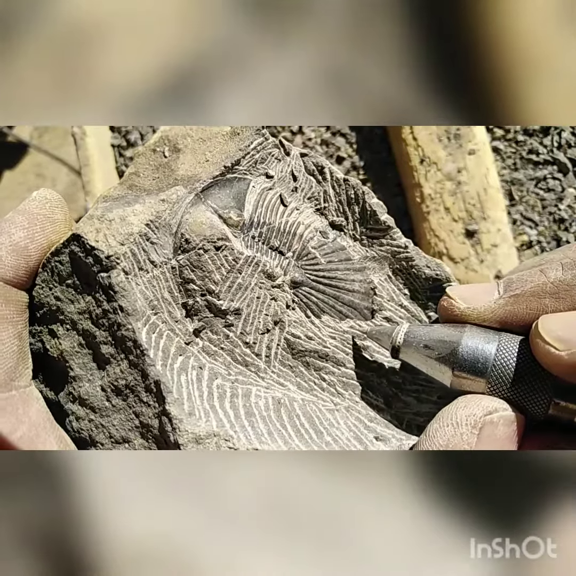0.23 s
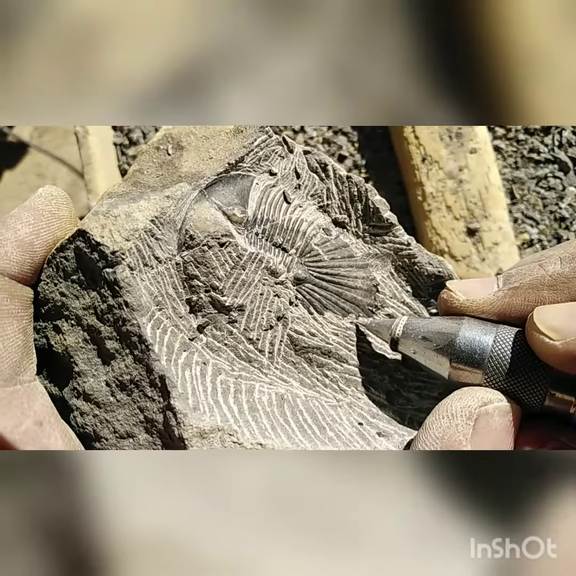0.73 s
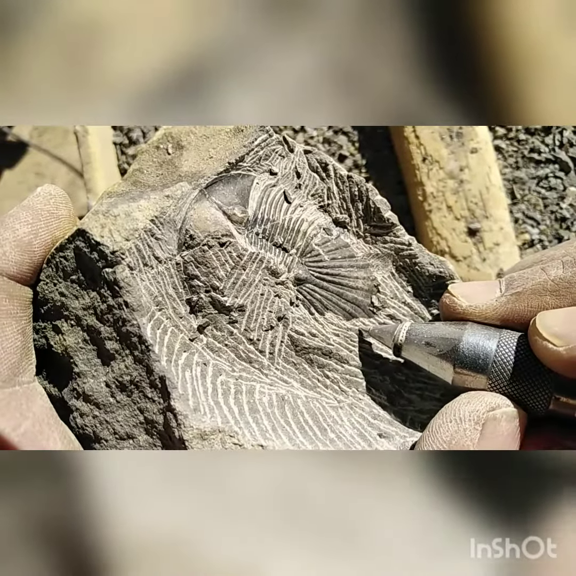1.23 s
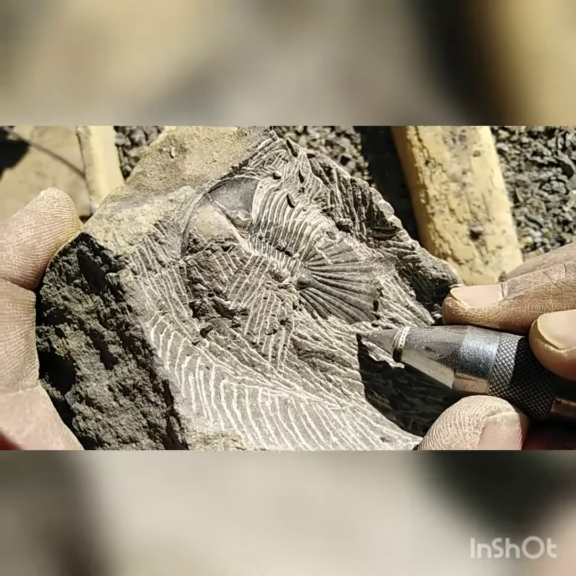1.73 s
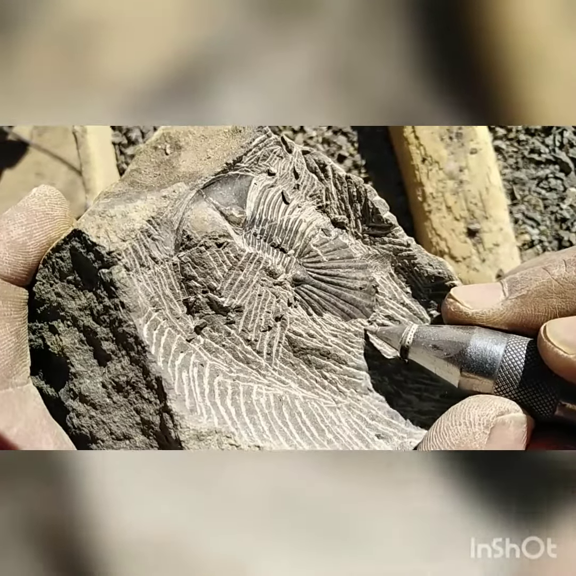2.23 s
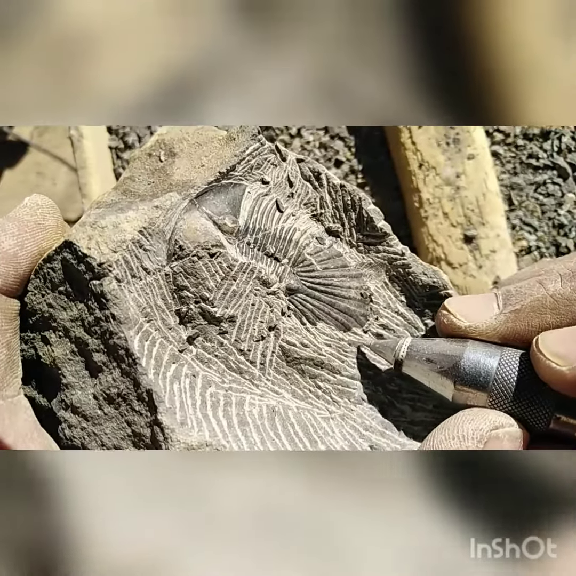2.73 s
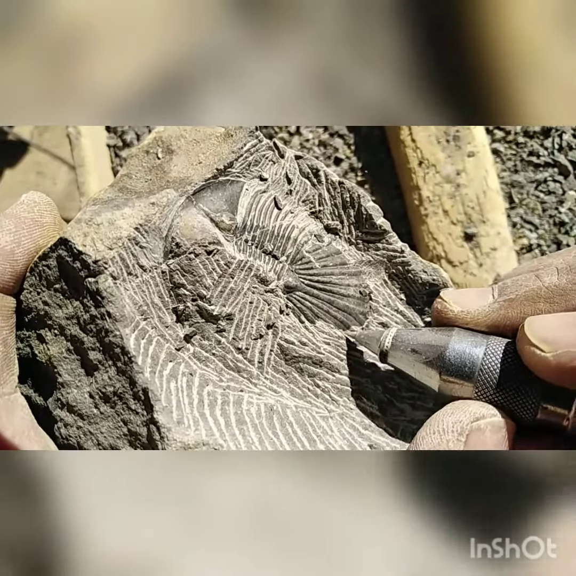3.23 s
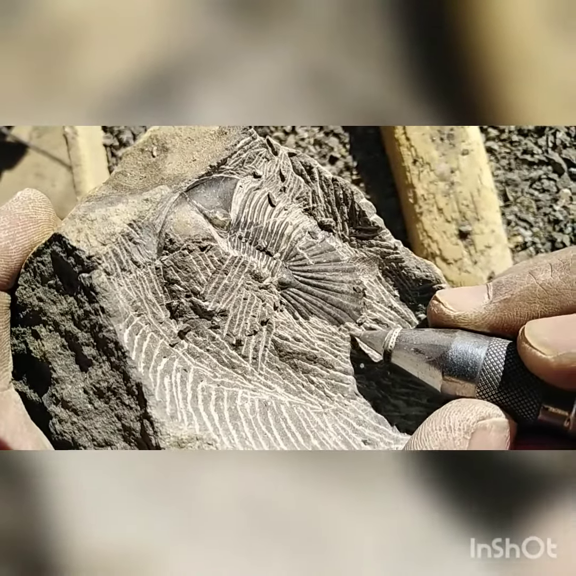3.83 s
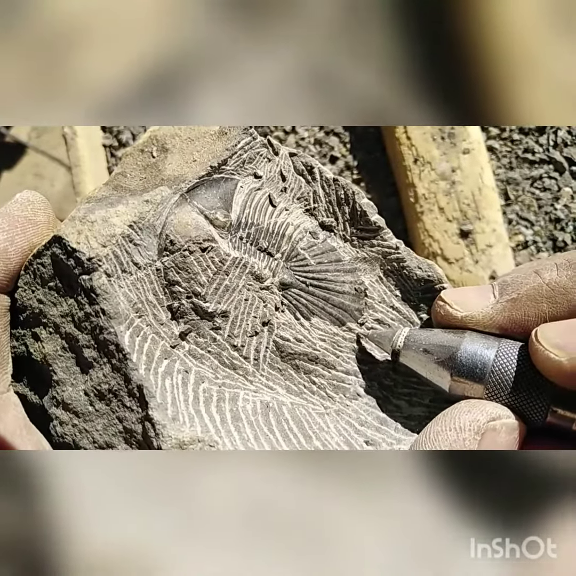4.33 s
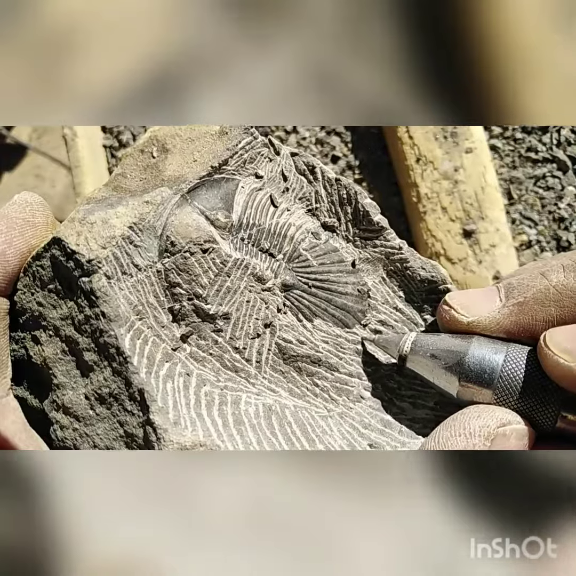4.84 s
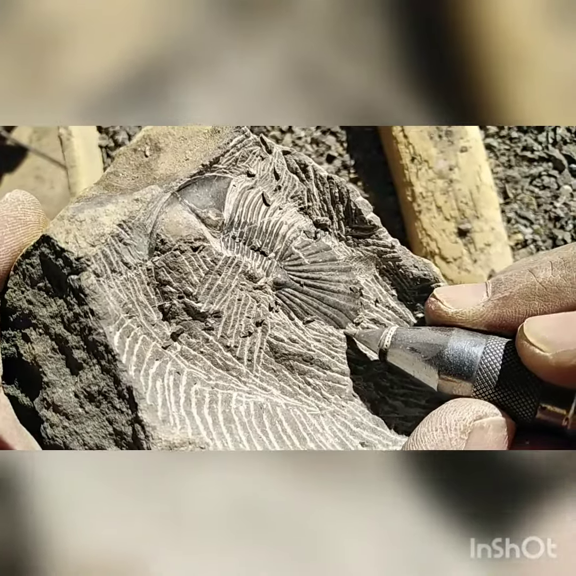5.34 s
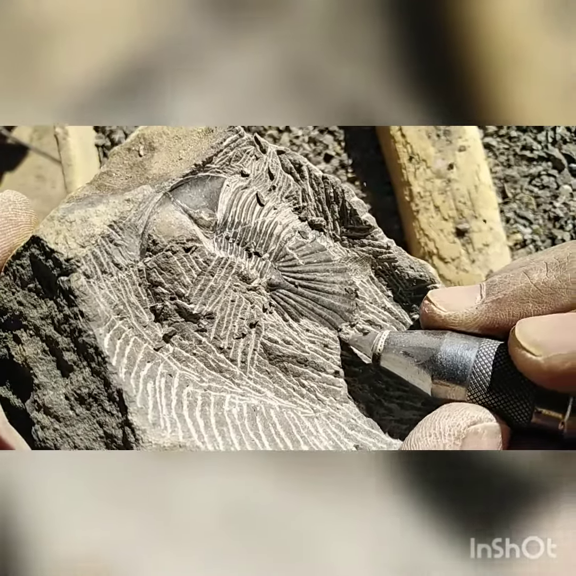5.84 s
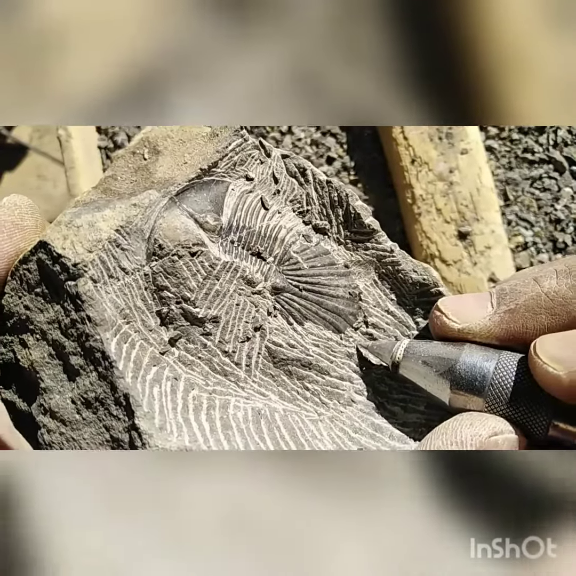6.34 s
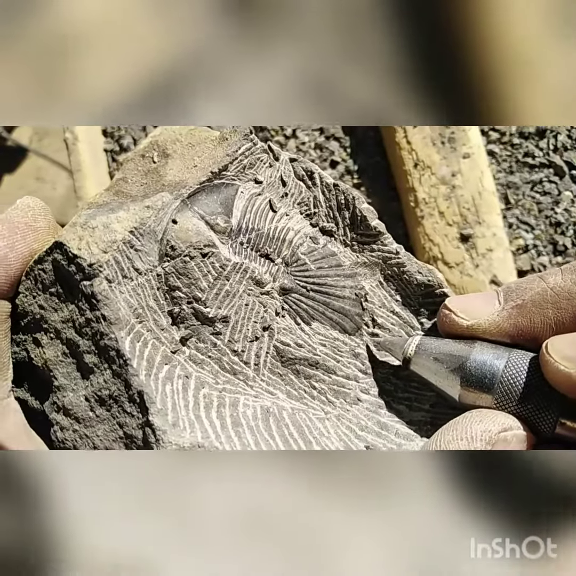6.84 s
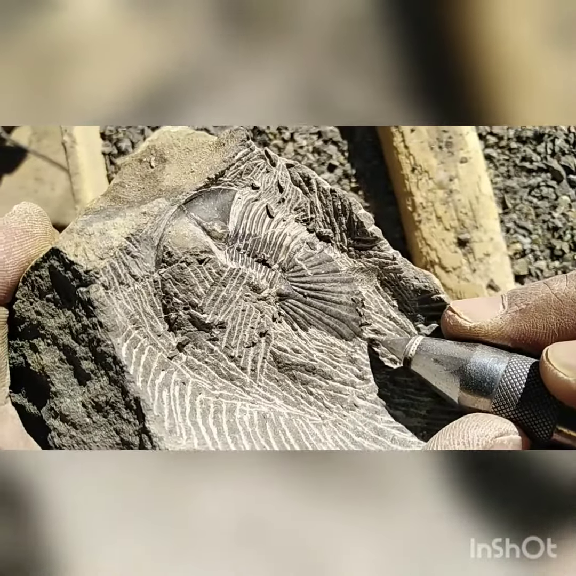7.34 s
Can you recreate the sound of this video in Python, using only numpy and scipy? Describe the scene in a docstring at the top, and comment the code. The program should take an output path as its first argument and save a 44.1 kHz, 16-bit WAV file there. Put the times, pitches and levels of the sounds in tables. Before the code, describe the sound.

A pneumatic scribe buzzes and hisses, rising in pitch with a gritty metallic ring each time its tip chips at rock.

```python
"""A pneumatic scribe chips rock from a fossil, close to a microphone pair and a little to its right.
Its piston lets out a puff of air every cycle, summed from overtones: a clean buzz, with a hiss of noise.
Pressed on the stone, the buzz climbs and roughens, and uneven blows ring the modes of the steel tip
while bursts of noise make the grit breaking away. A thin barrel whine, a low room wash and three dull
bumps lie underneath."""
import sys
import numpy as np
from scipy import signal
from scipy.fft import rfft, irfft, next_fast_len
from scipy.io import wavfile
from scipy.ndimage import uniform_filter1d, minimum_filter1d

SR = 44100
rng = np.random.default_rng(int(sys.argv[2]) if len(sys.argv) > 2 else 0)


def unload_audio(sound):
    """Save the sound as a 16-bit wav file, at the path given as the first command line argument."""
    columns = np.transpose(np.atleast_2d(sound))
    # keep every value between -1 and 1, then stretch to whole-number steps
    steps = np.round(np.clip(columns, -1, 1) * 32767)
    wavfile.write(sys.argv[1], SR, steps.astype(np.int16))


N = 334719
TIME = np.arange(N) / SR
SIZE = next_fast_len(N + 4096, True)  # padded for filtering
FREQS = np.fft.rfftfreq(SIZE, 1 / SR)
IDLE_HZ = 426  # piston speed running free, before its waver and sag


def amp(db):
    """Decibels to gain."""
    return 10 ** (np.asarray(db) / 20)


def unit(x):
    """Scales to an rms of one."""
    return x / np.sqrt(np.mean(x ** 2) + 1e-20)


def curve(rows):
    """A control curve at every sample."""
    return np.interp(TIME, *np.transpose(rows))


def spectrum(rows, axis=1):
    """One column of a table, joined on a log-frequency axis."""
    rows = np.asarray(rows, float)
    return np.interp(np.log(FREQS + 1), np.log(rows[:, 0]), rows[:, axis])


def shaped(x, response):
    """Filters by a frequency response."""
    return irfft(rfft(x, SIZE) * response, SIZE)[..., :N]


def causal(db):
    """The minimum-phase response with this gain: it rings only after each blow."""
    cepstrum = irfft(np.log(amp(db)), SIZE)
    cepstrum[1:SIZE // 2] *= 2
    cepstrum[SIZE // 2 + 1:] = 0
    return np.exp(rfft(cepstrum))


def late(lag_s):
    """The response of a delay in seconds."""
    return np.exp(-2j * np.pi * FREQS * lag_s)


def wander(rate_hz, size=16384, step=32):
    """Smooth chance, up to about this rate, drawn once every few samples (step)."""
    hz = np.fft.rfftfreq(size, step / SR)
    slow = irfft(rfft(rng.standard_normal(size)) * np.exp(-(hz / rate_hz) ** 2))
    return np.interp(np.arange(N) / step, np.arange(size), unit(slow))


def clicks(times, sizes):
    """Clicks placed between the samples as windowed sincs."""
    at = np.floor(times * SR).astype(int)[:, None] + np.arange(-7, 9)
    off = at - times[:, None] * SR
    taps = sizes[:, None] * np.sinc(off) * np.cos(np.pi * off / 16) ** 2
    return np.bincount(np.clip(at, 0, N).ravel(), taps.ravel(), N + 1)[:N]


def noise_pair(gate, colour, likeness, lag_s):
    """Gated noise as the two microphones hear it: partly alike, later on the left."""
    near, other = rng.standard_normal((2, N)) * gate
    c = np.clip(likeness, 0, 1)
    far = c * near + np.sqrt(1 - c * c) * other
    left = shaped(far, amp(spectrum(colour, axis=1)) * late(lag_s))
    right = shaped(near, amp(spectrum(colour, axis=2)))
    return unit(np.array([left, right]))


def room(room_db=4, bump_hz=72, bump_s=0.012, bump_db=4):
    """A low wash of background noise, and dull decaying bumps as the rock is handled."""
    # colour of the work place: pitch_hz, relative level_db
    room_colour = [(25, -24), (45, -3), (70, 0), (110, 3), (180, 7), (300, 0.5), (500, -6.5), (900, 1),
                   (2000, -10), (5000, -14.5)]
    # slow swell of the background, ahead of room_db: time_s, level_db
    swell = [(0.0, -48.5), (3.3, -48), (5.9, -46), (6.21, -42), (6.5, -47), (7.59, -47.5)]
    # soft knocks of the hands on the rock, ahead of bump_db and the decay: time_s, level_db
    bumps = [(0.769, -40), (1.449, -34), (2.299, -30)]
    common, left, right = shaped(rng.standard_normal((3, N)), amp(spectrum(room_colour)))
    pair = np.array([0.77 * (common + 0.76 * left), common + 0.58 * right])
    wash = amp(curve(swell) + room_db) * unit(pair)
    for s, db in bumps:
        age = np.maximum(TIME - s + bump_s / 2, 0)
        thud = age / bump_s * np.exp(-age / bump_s) * np.sin(2 * np.pi * bump_hz * age)
        wash = wash + amp(db + bump_db) * thud
    return wash


def piston_speed(lean_power=1.6, run_down_power=2.05, waver_hz=.45, sag_hz_per_s=.2,
                 jam_build_s=.03, jam_yield_s=.004, jam_drop_share=.6):
    """Strokes per second: each push raises the speed from idle, holds it and lets it run down; jams add surges."""
    # the hand leans on the tool and the piston speeds up:
    # start_s, full_pressure_s, let_go_s, top_speed_hz, speed_when_let_go_hz, run_down_s
    pushes = [(0.312, 0.678, 0.75, 487, 499, 0.0098), (0.917, 1.209, 1.35, 481.8, 462.5, 0.028),
              (1.47, 1.702, 1.89, 476, 493.4, 0.058), (2.186, 2.408, 2.5, 496.4, 477.5, 0.0084),
              (2.635, 2.95, 3.124, 513.5, 492.7, 0.21), (3.487, 3.755, 3.945, 522, 498, 0.14),
              (4.034, 4.46, 4.515, 498.6, 503.9, 0.014), (4.596, 5.024, 5.135, 516.3, 511.4, 0.18),
              (5.438, 5.627, 5.872, 530.2, 480.2, 0.018), (6.206, 6.48, 6.48, 656, 649, 0.014),
              (6.895, 7.006, 7.11, 495.8, 502.8, 0.03), (7.222, 7.498, 7.58, 541, 505, 0.11)]
    # the tip jams, the piston races, and it drops back as the stone yields: time_s, extra_speed_hz
    jams = [(1.235, 18.8), (1.85, 14.1), (2.427, 29.1), (3.03, 42.5), (3.125, 22.3), (5.145, 20.6),
            (5.662, 16), (6.494, 24), (7.53, 26)]
    extra = np.zeros(N)
    for start, full, let_go, top_hz, end_hz, run_down in pushes:
        # pressure builds slowly at first; the speed falls fastest just after letting go
        lean = np.clip((TIME - start) / (full - start), 0, 1) ** lean_power
        ease = np.clip(1 - (TIME - let_go) / run_down, 0, 1) ** run_down_power
        held = np.interp(TIME, [full, let_go], [top_hz, end_hz]) - IDLE_HZ
        extra = np.maximum(extra, lean * ease * held)
    for s, jam_hz in jams:
        swing = np.interp(TIME, [s, s + jam_yield_s], [1, -jam_drop_share])
        extra += jam_hz * swing * np.exp(-np.abs(TIME - s) / jam_build_s)
    # the air supply is never quite even
    return IDLE_HZ + extra + waver_hz * wander(12) - sag_hz_per_s * (TIME - TIME.mean())


def piston(speed, load, free_jitter=0.00209, load_jitter=.014, load_wobble=.018):
    """Cycles run so far, and the moment of each stroke; rebounds off the stone unsettle the rhythm."""
    jitter = (free_jitter + load_jitter * load) * wander(220.34)
    wobble = load_wobble * np.minimum(load, 1) * wander(32)
    turns = np.cumsum(speed * (1 + jitter + wobble)) / SR
    strokes = np.interp(np.arange(1, int(turns[-1])), turns, TIME)
    return turns, strokes


def blow_force(strokes, blow_db=5, recoil=0.5, chatter_db=2.12):
    """A hard blow throws the tip clear, so hard and soft blows tend to alternate, in uneven runs."""
    chance = rng.standard_normal(len(strokes))
    seating = unit(signal.lfilter([1], [1, np.clip(recoil, 0, .9)], chance))
    chatter = chatter_db * np.interp(strokes, TIME, wander(38))
    return unit(amp(blow_db * np.tanh(seating) + chatter))


def contact(load, tip_db=1, dust_db=3.5, crumble_db=2.06, crumble_hz=10):
    """Each cut digs in, holds and lifts off: how hard the tip rings, how much dust flies, and the ring's pitch."""
    # the tip is on the stone, levels ahead of the gains below: touch_s, clear_s, dig_in_s, lift_off_s,
    # ring_db, ring_pitch_hz (target), dust_db, dust_gained_from_touch_to_clear_db
    cuts = [(-0.02, 0.066, 0.011, 0.067, -22, 6560, -30, 0),
            (0.345, 0.389, 0.01, 0.015, -19.5, 6790, -34, 0),
            (0.408, 0.777, 0.019, 0.032, -16, 6790, -30, -4),
            (0.952, 1.4, 0.057, 0.096, -14.5, 6870, -33.5, -9),
            (1.498, 1.95, 0.01, 0.072, -13.5, 6600, -31.5, -1),
            (1.899, 2.06, 0.021, 0.047, -25.5, 6598, -36, 0),
            (2.072, 2.123, 0.0037, 0.023, -15.5, 6790, -26, -3.5),
            (2.108, 2.541, 0.14, 0.1, -14, 6730, -30.5, -5),
            (2.626, 2.95, 0.044, 0.03, -14.5, 6780, -26.5, -1),
            (2.92, 3.142, 0.061, 0.03, -16.5, 6700, -29.5, -4),
            (3.123, 3.256, 0.011, 0.024, -16, 6650, -33.5, -2),
            (3.368, 4.027, 0.0046, 0.056, -16.5, 6713, -26, -2.5),
            (4.018, 4.069, 0.034, 0.011, -16.5, 6520, -32, 0),
            (4.098, 4.612, 0.002, 0.13, -15.5, 6794, -21.5, 1),
            (4.53, 5.359, 0.14, 0.13, -14.5, 6778, -25, -2),
            (5.345, 5.918, 0.056, 0.11, -15.5, 6745, -23.5, 0.5),
            (5.994, 6.048, 0.02, 0.019, -18.5, 6580, -31, 0), (6.081, 6.34, 0.21, 0.02, -19, 6524, -30, 0),
            (6.316, 6.612, 0.026, 0.068, -14, 6694, -24, -2.5),
            (6.643, 6.927, 0.14, 0.01, -32.5, 6620, -36, 7),
            (6.923, 7.163, 0.004, 0.056, -13, 6834, -23, 3.5),
            (7.205, 7.649, 0.11, 0.02, -11.5, 6830, -30, -6)]
    # the tip skids and its bite changes for a moment, mostly weaker: time_s, gain_db
    skids = [(0.709, -10), (1.33, -6), (1.53, -8.5), (2.155, 1.5), (4.272, -3), (5.196, -7), (5.812, -10),
             (7.104, -11)]
    # a flake gives way in a surge of dust: time_s, gain_db
    flakes = [(0.5, 4), (1.84, 6), (2.78, 4.5), (3.59, 3.5), (3.78, 2), (5.06, 3), (6.37, 1)]
    touch_db, touch_s = -1.5, .012  # the ring starts a little softer, then settles
    ring_load_db, dust_load_db = -1.17, 2.24  # per unit of load: pressure damps the ring and adds dust
    dust_arch_db = 1.5  # extra dust in the middle of a cut
    skid_s, skid_dust_share, flake_s = .015, 0.49, 0.047
    bite, dust, pitch = np.zeros(N), np.zeros(N), []
    for touch, clear, dig_in, lift_off, ring_db, ring_hz, cut_dust_db, gained_db in cuts:
        age = np.maximum(TIME - touch, 0)
        along = np.minimum(age / (clear - touch), 1)
        seated = np.clip(np.minimum(age / dig_in, (clear - TIME) / lift_off), 0, 1)
        cut_ring_db = ring_db + touch_db * np.exp(-age / touch_s)
        bite = np.maximum(bite, seated * amp(cut_ring_db))
        rising_db = cut_dust_db + gained_db * (along - 1.0)
        dust = np.maximum(dust, seated * amp(rising_db + dust_arch_db * np.sin(np.pi * along)))
        pitch.append(((touch + clear) / 2, ring_hz))
    skid_db = sum(db * np.exp(-((TIME - s) / skid_s) ** 2) for s, db in skids)
    flake_db = sum(db * np.exp(-((TIME - s) / flake_s) ** 2) for s, db in flakes)
    bite *= amp(tip_db + ring_load_db * load + skid_db)
    uneven_db = skid_dust_share * skid_db + flake_db + crumble_db * wander(crumble_hz)
    dust *= amp(dust_db + dust_load_db * load + uneven_db)
    return bite, dust, curve(pitch)


def grit(turns, force, dust):
    """Every blow crushes stone into a short burst of dust, more for a harder blow."""
    # colour of crumbling stone: pitch_hz, relative left_db, relative right_db
    grit_colour = [(300, -47, -50), (1240, -9.5, -31), (3060, -13, -2.5), (3740, -11, -6), (4450, -15, 2),
                   (5630, -13, 5), (6150, 16, -26), (7350, -12, -13), (7600, 12.5, 14), (8300, 15.5, 4),
                   (9840, 7, 4), (11700, -13, -9), (13300, -0.5, -1.5), (14500, -20, -25)]
    crush = force[np.clip(turns.astype(int) - 1, 0, len(force) - 1)]
    gate = .25 + crush * np.exp(-(turns % 1) / .7)  # fades over each cycle
    return dust * noise_pair(gate, grit_colour, likeness=0.75, lag_s=0.000271)


def hiss(turns, steady=0.95, puff_share=1.0):
    """Air leaks all the time and spurts once a stroke, the spurt fading over a share of the cycle."""
    # colour of the exhaust hiss: pitch_hz, relative left_db, relative right_db
    hiss_colour = [(500, -52, -41), (3460, -41, -39), (4640, -50, 1.5), (5600, -8, 0), (6500, 0.5, 3),
                   (7650, 2.5, 7), (7900, 7.5, 4), (9300, 0.5, -1.5), (11800, -14, -11.5), (12700, -5, -7),
                   (14600, -9, -5)]
    # level of the leaking air: time_s, level_db
    leak = [(0, -24), (0.85, -26), (3.3, -24), (5.9, -23.5), (7.59, -23)]
    gate = steady + np.exp(-(turns % 1) / puff_share)
    return amp(curve(leak)) * noise_pair(gate, hiss_colour, likeness=0.26, lag_s=0.000291)


def barrel(strokes, barrel_db=-25, left_db=-13, grip_db=0.5):
    """The piston taps the barrel on every stroke: a thin metallic whine, damped unevenly by the grip."""
    # response of the tapped barrel: pitch_hz, relative level_db
    barrel_colour = [(3000, -48.5), (4200, -33), (4700, 0), (5100, -31), (5550, -3), (5960, 6.5),
                     (6400, 6.5), (6800, 1), (7250, -3), (8000, -44), (11000, -31)]
    taps = clicks(strokes, 1 + .2 * rng.standard_normal(len(strokes)))
    level = amp(barrel_db + grip_db * wander(13.0))
    near = level * unit(shaped(taps, causal(spectrum(barrel_colour))))
    return np.array([amp(left_db) * shaped(near, late(0.000362)), near])


def tip(strokes, force, load, ring_hz, slip_s=.00004, rebound=0.65, rebound_s=0.000802,
        rebound_slip_s=0.000245, rise_s=.0002, bright_db=4, rest_hz=6720, drift=.7):
    """Each blow rings the tip's modes, brighter under load, and the tip bounces once more after it."""
    # modes of the steel tip on the stone, ahead of the pitch shift: pitch_hz, width_hz,
    # relative left_db, relative right_db
    modes = [(6297, 220, -66, -1), (6722, 397, -4, 7), (7097, 380, -6.5, -9), (8020, 410, -16.5, -3.5),
             (10330, 266, -21, -24)]
    chance = rng.standard_normal((len(strokes), 3 + 2 * len(modes))).T
    first = strokes + slip_s * chance[0]
    bounce = strokes + rebound_s + rebound_slip_s * chance[1]
    times = np.concatenate([first, bounce])
    sizes = np.concatenate([force, rebound * np.abs(chance[2])])
    t = np.arange(512) / SR
    ring = np.zeros((2, N), complex)
    pressed = np.interp(times, TIME, load)
    for (hz, width, left_db, right_db), luck in zip(modes, chance[3:].reshape(len(modes), -1)):
        mode = np.exp((2j * hz - width) * np.pi * t) * (1 - np.exp(-t / rise_s))
        mix = 1 + .3 * luck  # every blow strikes the modes in another balance
        brightness = amp(bright_db * pressed * np.log2(hz / rest_hz))
        blows = clicks(times, sizes * mix * brightness)
        ring += amp([[left_db], [right_db]]) * signal.oaconvolve(blows, mode)[:N]
    # the contact with the stone pulls all modes up or down together
    shift = np.exp(2j * np.pi * np.cumsum(drift * (ring_hz - rest_hz)) / SR)
    left, right = (ring * shift).imag
    # keep only the treble of the ring, clear of low tones made by the pitch shift
    treble = 1 / (1 + (3800 / (FREQS + 1)) ** 10)
    pair = np.array([shaped(left, treble * late(0.0002815)), shaped(right, treble)])
    return pair / np.std(pair.mean(0))


def buzz(turns, speed, load, buzz_db=3, flutter_db=1.08, flutter_hz=70, shimmer_db=0.97,
         load_shimmer_db=0.37, knee_hz=455, span_hz=45, top_hz=5400, count=13):
    """One puff of exhaust a stroke, heard as a stack of overtones; a short, loaded stroke puffs more sharply."""
    # strength of the exhaust puffs, shaded by the fingers, ahead of buzz_db: time_s, level_db
    puff = [(0.0, -25), (1.5, -25), (1.61, -27.5), (1.73, -25.5), (4.44, -24.5), (5.01, -27.5), (5.16, -24),
            (5.45, -26), (5.77, -23.5), (6.09, -26), (6.26, -26.5), (6.3, -24), (6.49, -24), (6.51, -27.5),
            (6.72, -25.5), (7.59, -27)]
    # colour of the puffs: pitch_hz, running_free_db, under_load_db
    exhaust = [(434, 0.5, -0.5), (660.2, 0.5, 4), (824, -9, -7), (937, -17.5, -18), (1050, -19, -6),
               (1267, -5, 0), (1434, -2, -0.5), (1830, -11.5, -1.5), (2105, -4, -6.5), (2180, -6, 4.5),
               (2500, -11.5, -5.5), (3060, -13, -12), (3600, -25.5, -19), (3860, -14, -11),
               (4160, -19.5, -11)]
    # the buzz at the far (left) microphone against the near one: pitch_hz, level_db, lag_s
    far_port = [(422, -7.5, 0.00025), (516, -5.5, 0.00028), (880, -10.5, .00028), (1020, -3.5, 0.00026),
                (1260, -7, 0.00032), (1620, -13, 0.0004), (1640, -10, 0.00021), (1800, -5, 0.00021),
                (2127, -5, 0.00018), (2127, -4.5, 0.000221), (2295, -2.5, 0.000226), (2577, -2.5, 0.00029),
                (2850, -2.5, 0.00024), (3430, 0, 0.000284), (3860, -11, 0.00035)]
    table_hz, free_db, loaded_db = np.transpose(exhaust)
    pressed = np.clip((speed - knee_hz) / span_hz, 0, 1)
    near = np.zeros(N)
    for k in range(1, count):
        hz = k * speed
        db = (1 - pressed) * np.interp(hz, table_hz, free_db)
        db += pressed * np.interp(hz, table_hz, loaded_db)
        # the jet is turbulent: each overtone flutters by itself, the higher the more
        db += flutter_db * (1 + load) * np.log(k) * wander(flutter_hz)
        near += amp(db) / (1 + (hz / top_hz) ** 20) * np.cos(2 * np.pi * k * turns)
    shimmer = (shimmer_db + load_shimmer_db * load) * wander(58)
    near *= np.sqrt(2) * amp(curve(puff) + buzz_db + shimmer)
    far = shaped(near, amp(spectrum(far_port)) * late(spectrum(far_port, axis=2)))
    return np.array([far, near])


def scene():
    """One piston drives the buzz, the whine, the hiss and the blows on the stone."""
    speed = piston_speed()
    load = np.clip((speed - IDLE_HZ) / 80, 0, 1.8) ** .7
    turns, strokes = piston(speed, load)
    force = blow_force(strokes)
    bite, dust, ring_hz = contact(load)
    tool = buzz(turns, speed, load) + barrel(strokes) + hiss(turns)
    stone = bite * tip(strokes, force, load, ring_hz) + grit(turns, force, dust)
    return tool + stone + room()


def record(dry, edge_hz=14300):
    """A fast limiter holds the loudest peaks under full scale; then a low-pass sets the top of the band."""
    headroom = 1 / np.maximum(np.abs(dry) / .99, 1)
    gain = uniform_filter1d(minimum_filter1d(headroom, size=65), size=65)
    low_pass = signal.firwin(1023, edge_hz, window=("kaiser", 8), fs=SR)
    return signal.oaconvolve(dry * gain, low_pass[None], "same")


dry = scene()
out = record(dry)
unload_audio(out)
```